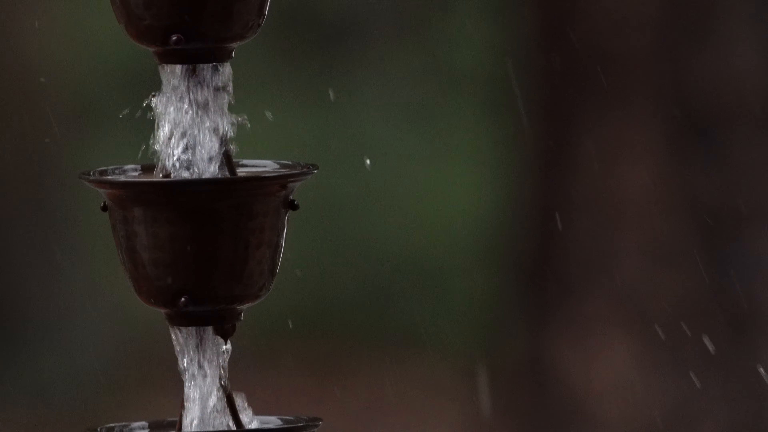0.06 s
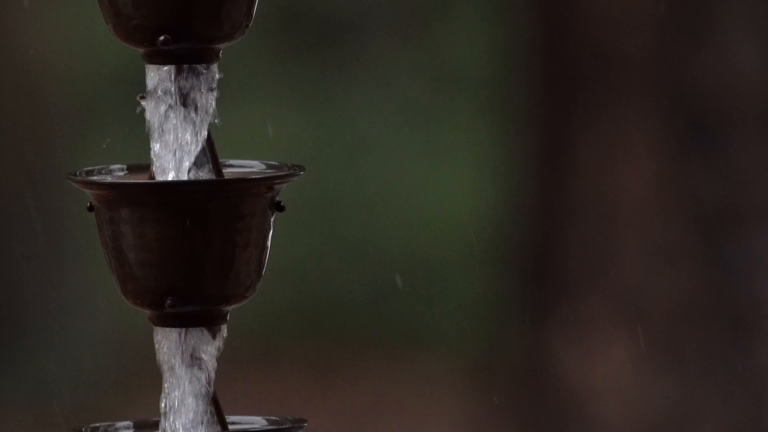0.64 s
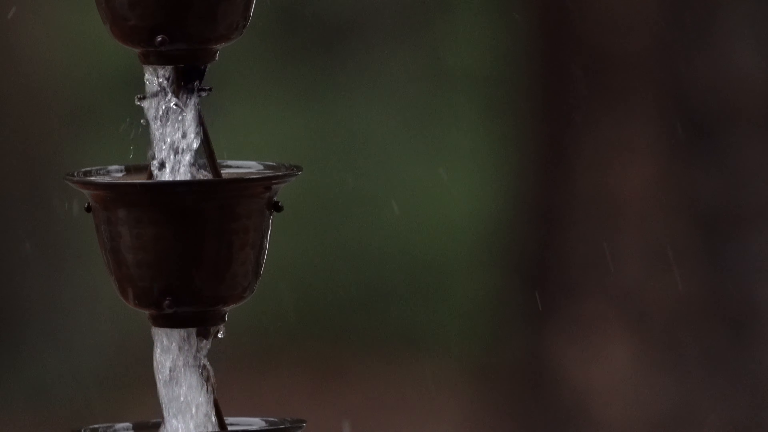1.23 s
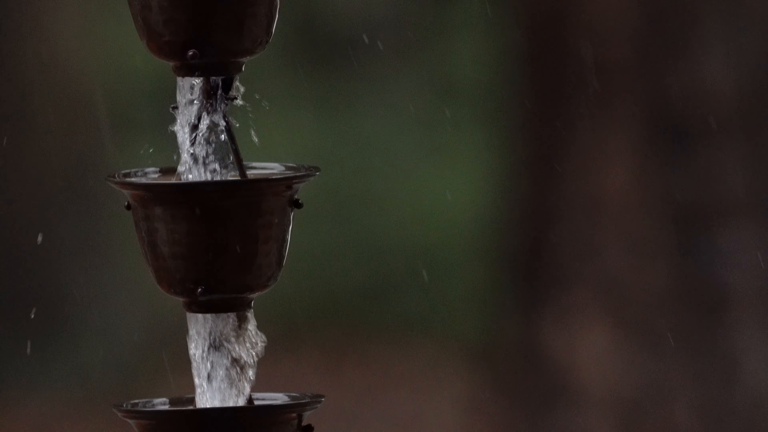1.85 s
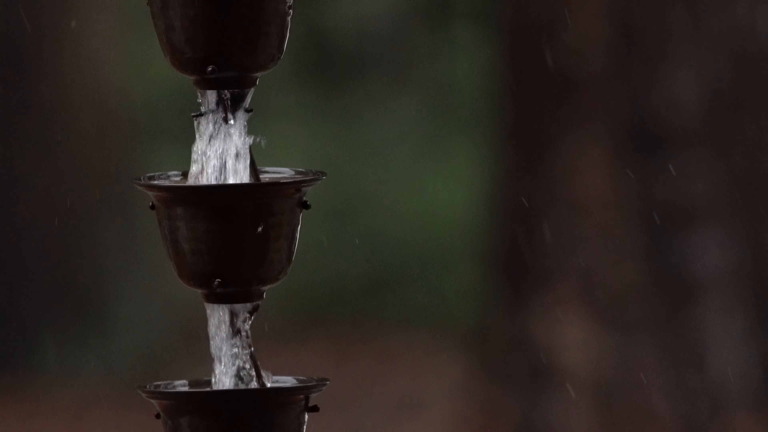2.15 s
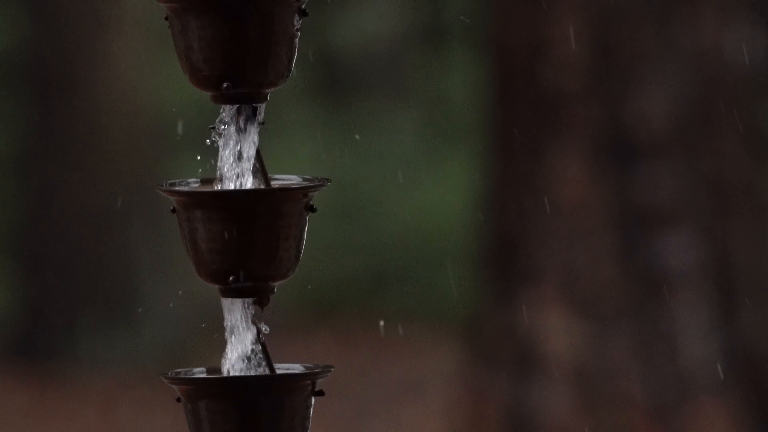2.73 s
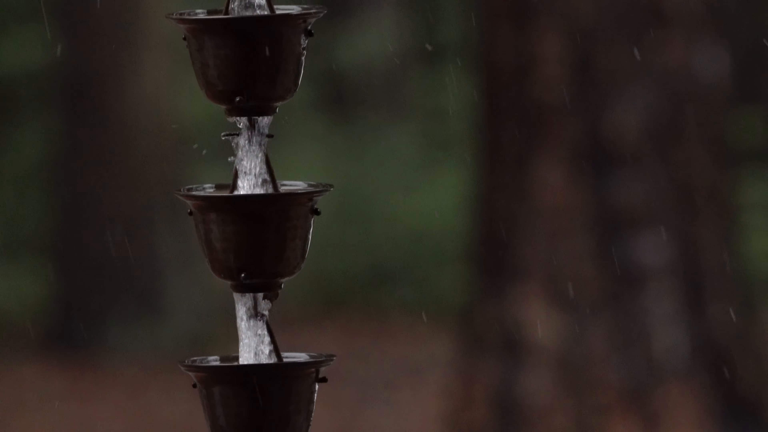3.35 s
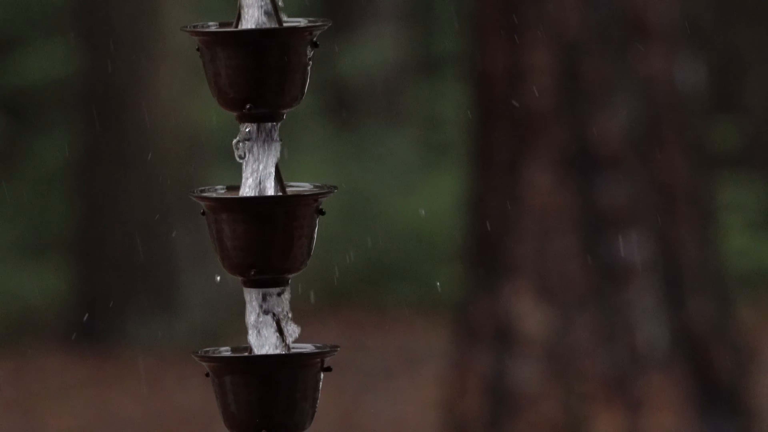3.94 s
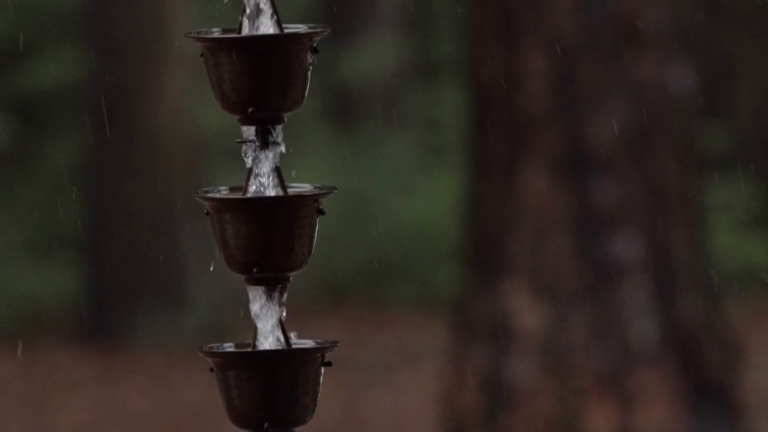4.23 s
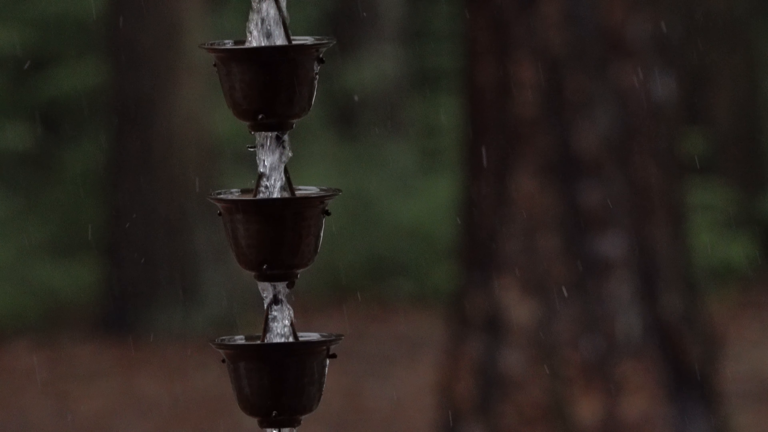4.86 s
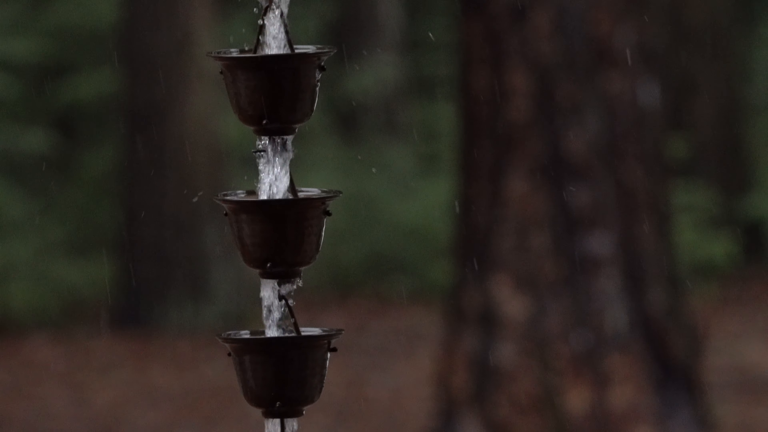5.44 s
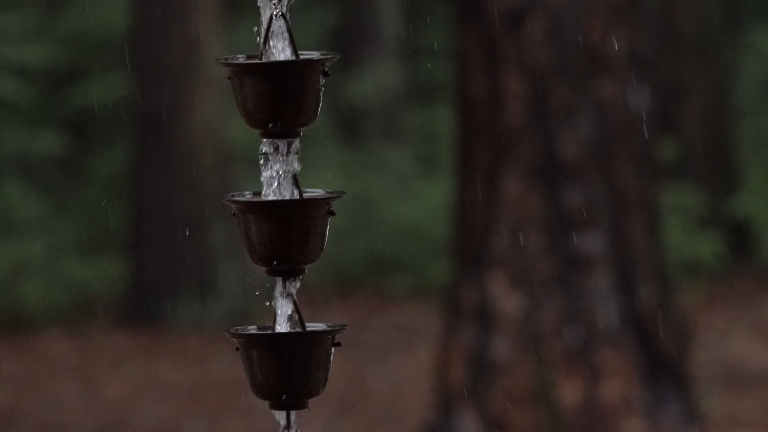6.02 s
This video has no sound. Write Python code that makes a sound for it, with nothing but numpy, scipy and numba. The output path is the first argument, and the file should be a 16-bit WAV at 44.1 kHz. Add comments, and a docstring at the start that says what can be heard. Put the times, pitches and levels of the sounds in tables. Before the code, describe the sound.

From start to finish, about six seconds, steady rain falls in a forest as a soft, wide wash. Close by and near the centre, water pours from cup to cup down a metal rain chain: a dense, bright splashing with small bubbles, fine hissing spray and a faint hollow tone from the cups. The flow stays nearly even, swelling slightly around 1.2, 2.2 and 2.9 seconds. Occasional tiny bubble plinks stand out, for example near 1.2 and 5.1 seconds. Faint small drops tick throughout. Fat drips smack down irregularly a little to the right, starting at about 0.6 seconds and coming thickly between 1 and 3.3 seconds. A sharper one lands near 4.1 seconds, and the strongest cluster comes at 5.7 to 5.9 seconds. The drips ring very briefly under a porch roof.

```python
"""Forest rain from a porch

Countless far drops merge into a steady wash. Roof water pours from cup to cup down a rain chain:
dense tiny bursts, ringing bubbles and fine spray over a dull note of the air in the cups.
Small drops tick close by; fat drips smack down a little to the right and ring under the roof."""
import sys
import numpy as np
from scipy import signal
from scipy.fft import rfft, irfft, next_fast_len
from scipy.io import wavfile
from scipy.ndimage import map_coordinates
from numba import njit

SR = 44100
rng = np.random.default_rng(int(sys.argv[2]) if len(sys.argv) > 2 else 0)


def transcribe(signal):
    """Save signal, clipped to [-1, 1], as a 16-bit WAV file at the path in sys.argv[1]."""
    frames = np.atleast_2d(signal).T
    limited = np.clip(frames, -1, 1)
    pcm = np.round(limited * 32767).astype(np.int16)
    wavfile.write(sys.argv[1], SR, pcm)


N = 268569
CHAIN_PAN_DB, CHAIN_LAG_S = -1.5, -.000012
DRIP_PAN_DB, DRIP_LAG_S = -6, .000136


def from_db(db):
    return np.exp(np.asarray(db) * (np.log(10) / 20))


def unit_rms(x):
    return x / np.sqrt(np.mean(x ** 2) + 1e-20)


def at_hz(rows, hz):
    """Each column of a spectrum table at hz."""
    f, *columns = np.transpose(rows)
    return [np.interp(np.log(hz), np.log(f), c) for c in columns]


def drift(rate_hz):
    """Random curve through unit-variance knots."""
    knots = rng.standard_normal(2000)
    return np.interp(np.arange(N) / SR * rate_hz, np.arange(len(knots)), knots)


def resonate(x, hz, cycles):
    """Two equal resonators in series, each decaying 60 dB in `cycles`."""
    hz = min(hz, SR * .42)
    r = np.exp(-np.log(1000) * hz / (cycles * SR))
    b, a = [1 - r, 0, r - 1], [1, -2 * r * np.cos(2 * np.pi * hz / SR), r * r]
    for _ in range(2):
        x = signal.lfilter(b, a, x + 1e-18)
    return x


def place(x, pan_db, lag_s):
    """Point source: reaches the left ear lag_s later and pan_db louder."""
    size = next_fast_len(N + 256)
    delay = np.exp(-2j * np.pi * np.fft.rfftfreq(size, 1 / SR) * lag_s)
    left = irfft(rfft(x, size) * delay, size)[:N]
    return np.array([left * from_db(pan_db / 2), x * from_db(-pan_db / 2)])


def porch(x, pan_db, t60_s=0.26, echo_s=.0101, echo_db=-13):
    """Roof and walls: one clear echo in a short diffuse tail."""
    t = np.arange(SR // 2) / SR
    tail = rng.standard_normal((2, len(t))) * from_db(-60 * t / t60_s)
    tail *= 1 - np.exp(-t / 0.00063)
    tail /= np.sqrt(np.sum(tail ** 2, axis=1, keepdims=True))
    tail[:, round(echo_s * SR)] += from_db(echo_db)
    return signal.oaconvolve(x[None], tail, axes=1)[:, :N] * from_db([[pan_db / 2], [-pan_db / 2]])


def forest_rain(flicker, dull_db, dull_hz):
    """Far drops merge into a wash, dulled by distance, centred in the bass and wide in the treble."""
    # wash spectrum before dulling: freq_hz, density_db
    spectrum = [(18, -72), (30, -47.5), (127, -20), (259, -14), (364, -6), (1220, 0.5), (1500, -1.5),
                (3220, 2), (8080, -1), (11100, -11), (14000, -2), (16000, -37)]
    # wash between the ears: freq_hz, coherence, left_minus_right_db
    width = [(30, .8, 0), (60, 0.94, 0), (140, 1, 0.5), (400, 0.95, -0.9), (800, 0.74, -2.6),
             (1300, 0.36, -3), (2400, 0.071, -4.5), (5440, 0.033, 0.5), (8550, .03, -10), (16000, .05, 4)]
    out, edges_hz = 0, np.geomspace(28, 17000, 27)
    white = rng.standard_normal((2, 2, N))
    for k, (low, high) in enumerate(zip(edges_hz, edges_hz[1:])):
        band = signal.butter(2, [low, high], "band", fs=SR, output="sos")
        mid, side = signal.sosfilt(band, white[k % 2])
        hz = np.sqrt(low * high)
        coherence, pan_db = at_hz(width, hz)
        level_db = at_hz(spectrum, hz)[0] - dull_db * hz / (hz + dull_hz)
        gain = from_db(level_db) * (1 + flicker * drift(14))
        pair = mid + np.sqrt((1 - coherence) / (1 + coherence)) * side * [[1], [-1]]
        out = out + gain * pair * from_db([[pan_db / 2], [-pan_db / 2]])
    return out / np.std(out.mean(axis=0))


def stream():
    """Splash and spray levels follow the flow and the uneven sloshing of the cups."""
    # stream strength in the cups: time_s, level_db
    flow = [(0.0, -32.5), (0.81, -33), (1.19, -31.5), (1.87, -34), (2.15, -31), (2.37, -34.5),
            (2.58, -32.5), (2.85, -31), (3.26, -33), (4.85, -33), (5.24, -33.5), (6.09, -33)]
    flow_db = np.interp(np.arange(N) / SR, *np.transpose(flow))
    swell_db = flow_db - flow_db.mean()
    slosh_db = 1.15 * drift(rate_hz=9.9)
    splash_db = -38 + 1.6 * swell_db + slosh_db
    spray_db = -40 + 1.1 * swell_db + slosh_db
    return splash_db, spray_db


def gurgle(together_db, apart_db, rate_hz=25):
    """Uneven spills favour now one bubble size, now another: dB by time and pitch."""
    per_pitch = rng.standard_normal((N * rate_hz // SR, 7))
    return together_db * rng.standard_normal((len(per_pitch), 1)) + apart_db * per_pitch


@njit
def ring_out(starts, rad_per_sample, decay_per_sample, sizes, length):
    """Sum of damped oscillations, each run down 60 dB."""
    out = np.zeros(length)
    for k in range(len(starts)):
        z, step = sizes[k] + 0j, np.exp(1j * rad_per_sample[k] - decay_per_sample[k])
        end = min(length, starts[k] + int(np.log(1000) / decay_per_sample[k]))
        for i in range(starts[k], end):
            out[i] += z.real
            z *= step
    return out


def grains(low_hz, high_hz, per_s, cycles, spread_db, surges_db):
    """Tiny water events ring at random times and pitches, many faint and few loud."""
    # splash spectrum: freq_hz, level_db
    spectrum = [(700, 0.5), (1200, -0.5), (1800, -1), (2700, 4), (4300, -0.5), (5700, 4), (7000, -2.5),
                (8300, -2), (11000, -9), (14000, -4), (16000, -15)]
    grain_rng = np.random.default_rng(rng.integers(2 ** 32))
    when, pitch, rank, sign = grain_rng.random((int(per_s * N / SR), 4)).T
    hz = (np.sqrt(low_hz) + pitch * (np.sqrt(high_hz) - np.sqrt(low_hz))) ** 2
    cell = [when * (len(surges_db) - 1), pitch * (surges_db.shape[1] - 1)]
    surge_db = map_coordinates(surges_db, cell, order=1)
    level_db = at_hz(spectrum, hz)[0] + surge_db - spread_db * np.log(np.maximum(rank, .02))
    sizes = from_db(level_db) * np.sign(sign - .5) * hz ** .75   # short rings need more height
    decay_per_sample = np.log(1000) * hz / (cycles * SR)
    out = ring_out((when * N).astype(np.int64), 2 * np.pi * hz / SR, decay_per_sample, sizes, N)
    return unit_rms(signal.sosfilt(signal.butter(2, 650, "high", fs=SR, output="sos"), out))


def pour(splash_db, spray_db, surges_db, spread_db):
    """The stream crackles as it breaks, whips in longer-ringing bubbles and throws off fine spray."""
    crackle = grains(965, 7760, per_s=4000, cycles=12, spread_db=spread_db, surges_db=surges_db)
    bubbles = grains(844, 8520, per_s=500, cycles=48, spread_db=spread_db, surges_db=surges_db)
    spray = grains(7800, 16100, per_s=6000, cycles=40, spread_db=spread_db, surges_db=surges_db)
    water = from_db(-4) * crackle + from_db(-8) * bubbles
    return from_db(splash_db) * water, from_db(spray_db - 2.5) * spray


def rain_chain(splash_db, spray_db):
    """The nearest cup is heard directly; the others, scattered by walls and roof, differ in each ear."""
    surges_db = gurgle(together_db=.5, apart_db=1.74)
    water, spray = pour(splash_db, spray_db, surges_db, spread_db=3.5)
    water = water + plinks(gain_db=3.5, decay_s=0.0019, chirp_per_s=1.1)
    near = place(water, CHAIN_PAN_DB, CHAIN_LAG_S) + place(spray, pan_db=-3.5, lag_s=CHAIN_LAG_S)
    ears = [pour(splash_db, spray_db, surges_db, spread_db=2) for ear in "LR"]
    far_water, far_spray = np.stack(ears, axis=1)
    scattered = from_db([[-.4], [2.2]]) * far_water + from_db([[-.6], [3.7]]) * far_spray
    return near + scattered + from_db(-5) * porch(water + spray, CHAIN_PAN_DB)


def cup_air(splash_db, hz, cycles, gain_db):
    """Churning water keeps the air in the cups ringing with a dull, hollow note."""
    air = unit_rms(resonate(rng.standard_normal(N), hz, cycles))
    return place(from_db(splash_db + gain_db + 1.2 * drift(16)) * air, CHAIN_PAN_DB, CHAIN_LAG_S)


def patter(splash_db, gain_db):
    """Small drops tick down close by."""
    surges_db = gurgle(together_db=1, apart_db=-4)
    ticks = grains(1500, 13000, per_s=90, cycles=7, spread_db=1.5, surges_db=surges_db)
    return place(from_db(splash_db + gain_db) * ticks, DRIP_PAN_DB, DRIP_LAG_S)


def fat_drips(ring_cycles, spray_cycles, burst_s, spatter_db, spatter_s):
    """Each smack is a sharply damped ring and a broad burst of spray, whose droplets spatter down."""
    # drip impacts: start_s, ring_hz, ring_db, spray_hz, spray_db
    drips = [(0.611, 2800, -23, 4800, -38), (1.0858, 8350, -27, 6560, -22), (1.12, 3200, -33, 2700, -30),
             (1.182, 2600, -41, 7500, -29), (1.2685, 1920, -26, 5600, -27), (1.2877, 3190, -30, 5400, -37),
             (1.589, 3960, -27.5, 9800, -36), (1.91, 6890, -29, 8700, -27), (1.9644, 4770, -21, 7900, -26),
             (2.0862, 7920, -33, 5400, -24), (2.1512, 1840, -24.5, 7300, -25.5),
             (2.1897, 3600, -33, 3900, -39), (2.337, 3400, -29, 3200, -28.5), (2.559, 6120, -32, 2500, -30),
             (2.628, 2070, -32, 5100, -35), (2.766, 5940, -27, 7000, -30), (2.8928, 2500, -30, 4800, -29),
             (2.9936, 5770, -27, 7300, -27), (3.0428, 1300, -28, 2880, -23), (3.256, 3450, -28, 6900, -29),
             (3.56, 3000, -31, 6000, -25), (3.9815, 11280, -34, 10800, -33),
             (4.0786, 3550, -22, 5770, -24.5), (4.5523, 1820, -28, 5500, -24),
             (4.6648, 7250, -29, 6600, -25), (4.7618, 5860, -28, 7100, -32), (4.9555, 5770, -30, 4930, -30),
             (5.2687, 11020, -27, 7300, -25), (5.545, 6000, -30, 4200, -25), (5.7393, 5560, -23, 6300, -20),
             (5.8796, 6200, -23.5, 4230, -22.5), (5.8978, 5680, -28, 3800, -24),
             (5.9203, 6300, -18.5, 5800, -25)]
    t = np.arange(SR // 8) / SR
    direct, to_porch = np.zeros((2, N + len(t)))
    for start_s, ring_hz, ring_db, spray_hz, spray_db in drips:
        burst, sizes = rng.standard_normal((2, len(t)))
        droplets = sizes * (rng.random(len(t)) < 2500 / SR) * np.exp(-t / spatter_s)
        splat = unit_rms(burst * np.exp(-t / burst_s)) + from_db(spatter_db) * unit_rms(droplets)
        spray = from_db(spray_db) * unit_rms(resonate(splat, spray_hz, spray_cycles))
        spray = np.pad(spray, (round(.0005 * SR), 0))[:len(t)]   # thrown up just after impact
        # water is soft: the ring builds over about a cycle
        ring = from_db(ring_db) * unit_rms(resonate(1. * (t == 0), ring_hz, ring_cycles))
        at = round(start_s * SR)
        direct[at:at + len(t)] += ring + spray
        to_porch[at:at + len(t)] += from_db(1.5) * ring + from_db(3) * spray
    near = from_db(-1.8) * place(direct[:N], DRIP_PAN_DB, DRIP_LAG_S)
    smack_gain = np.sqrt(.002 / t[-1])   # refers rms to a 2 ms smack
    return smack_gain * (near + porch(to_porch[:N], pan_db=-3.5))


def plinks(gain_db, decay_s, chirp_per_s):
    """A lone bubble rings briefly, rising in pitch as it nears the surface."""
    # bubbles bursting from the stream: start_s, pitch_hz, level_db
    bubbles = [(1.241, 1300, -23), (2.283, 1378, -30), (2.97, 2220, -26), (3.221, 7950, -26),
               (3.471, 2498, -32), (4.562, 8050, -28), (5.059, 8300, -23), (5.576, 10680, -27),
               (5.955, 5340, -25)]
    t = np.arange(SR // 20) / SR
    out = np.zeros(N + len(t))
    envelope = (1 - np.exp(-t / 0.00085)) * np.exp(-t / decay_s)
    for start_s, pitch_hz, level_db in bubbles:
        at = round(start_s * SR)
        tone = np.sin(2 * np.pi * pitch_hz * t * (1 + chirp_per_s * t))
        out[at:at + len(t)] += from_db(level_db + gain_db) * envelope * tone
    return out[:N]


def scene():
    """Wash, chain, patter and drips in stereo."""
    splash_db, spray_db = stream()
    wash = from_db(-36) * forest_rain(flicker=0.083, dull_db=7, dull_hz=2500)
    chain = rain_chain(splash_db, spray_db) + cup_air(splash_db, hz=754, cycles=6.5, gain_db=-18)
    drips = fat_drips(ring_cycles=7, spray_cycles=1.77, burst_s=0.001, spatter_db=-11, spatter_s=0.011)
    return wash + chain + patter(splash_db, gain_db=-26) + drips


def record(dry):
    """Steep low-pass at 16 kHz."""
    return signal.sosfilt(signal.ellip(12, .1, 80, 16000, fs=SR, output="sos"), dry)


dry = scene()
out = record(dry)
transcribe(out)
```